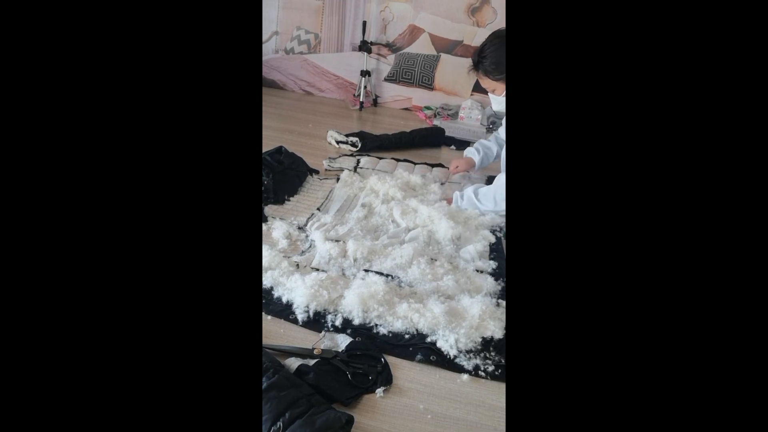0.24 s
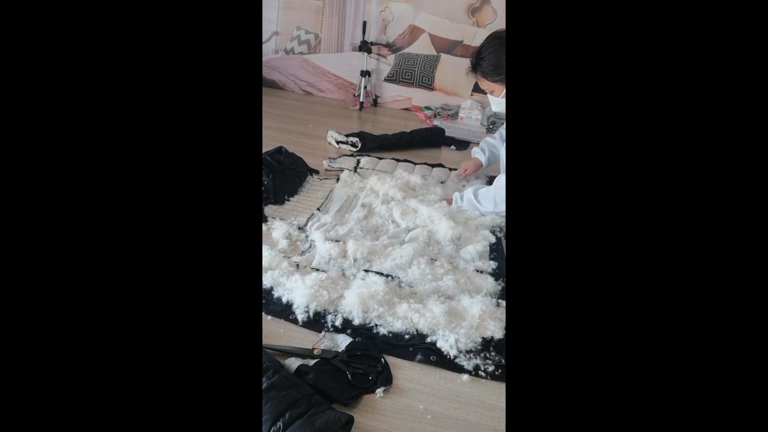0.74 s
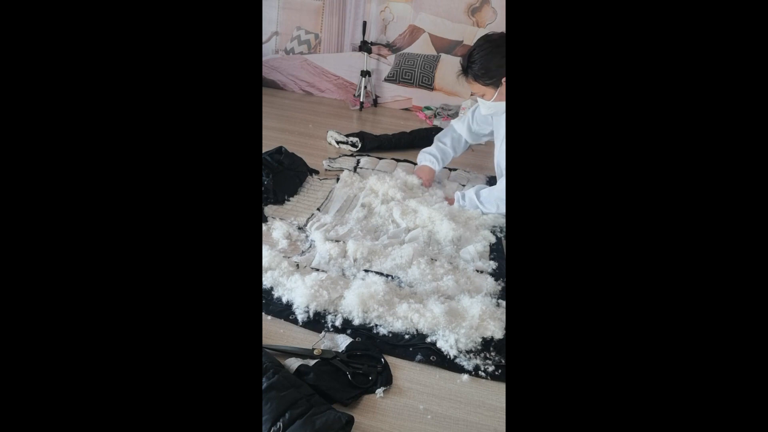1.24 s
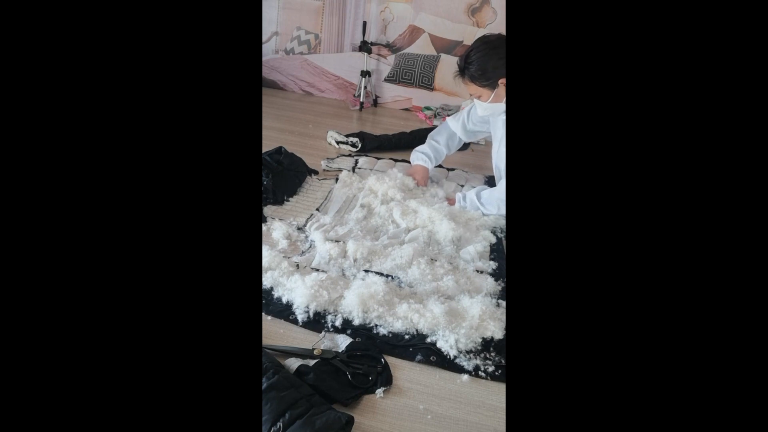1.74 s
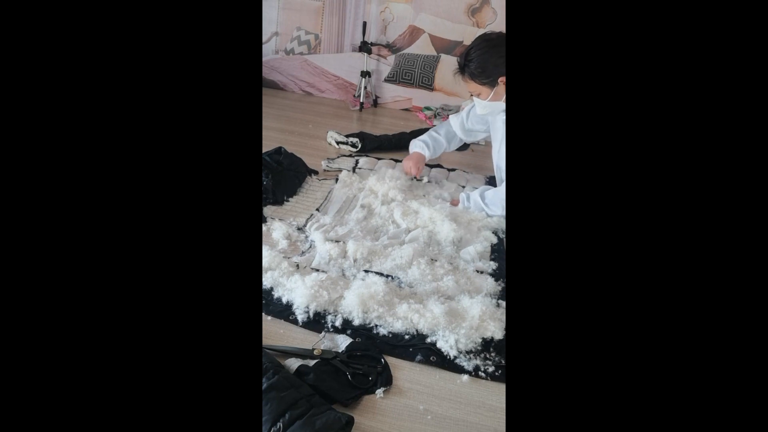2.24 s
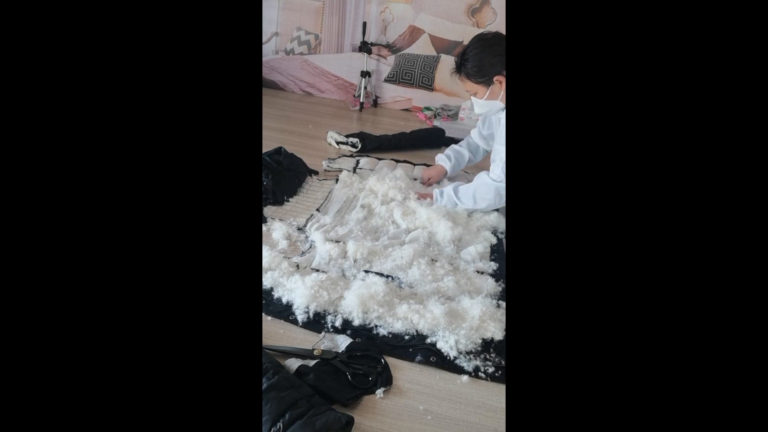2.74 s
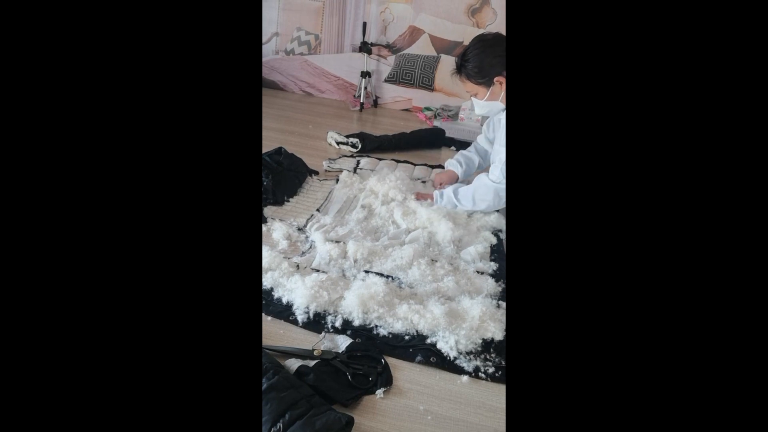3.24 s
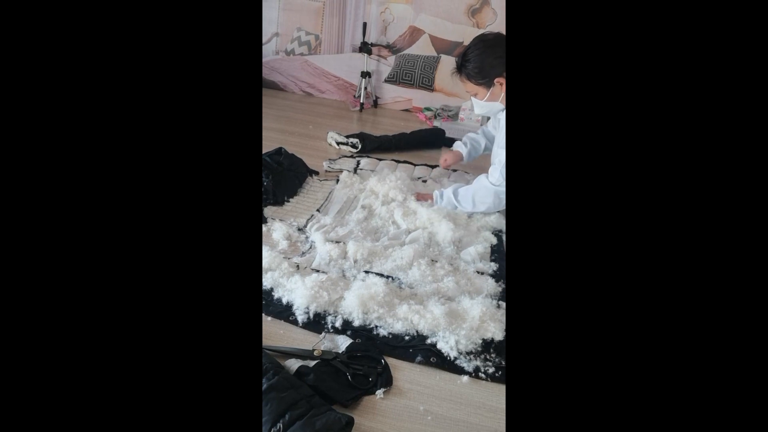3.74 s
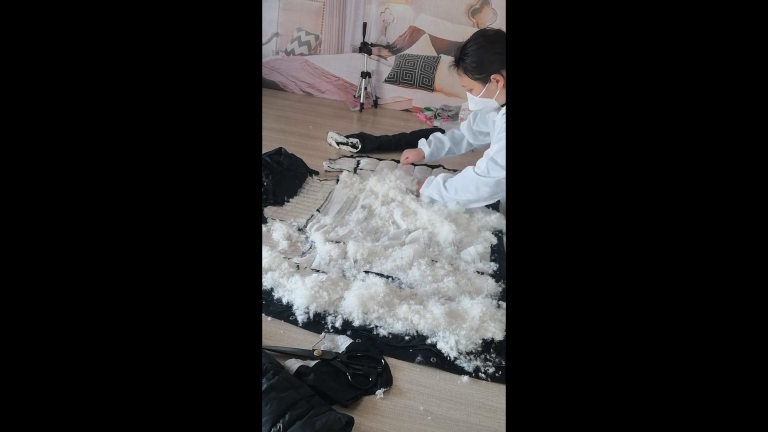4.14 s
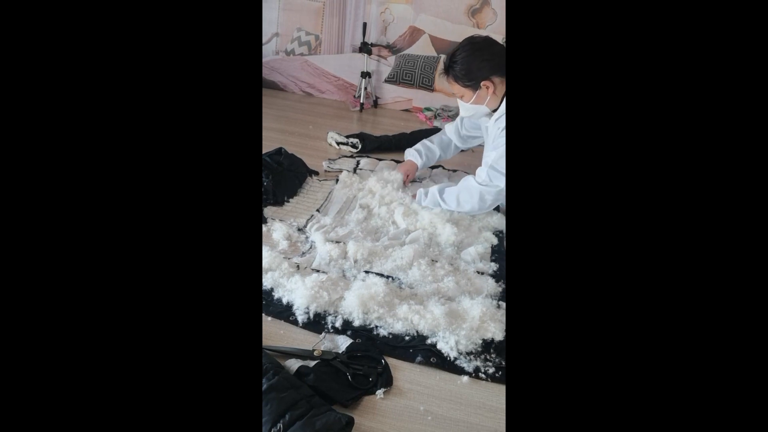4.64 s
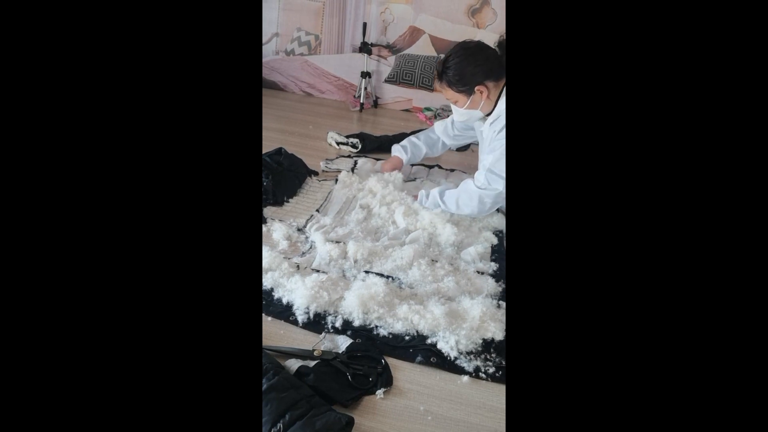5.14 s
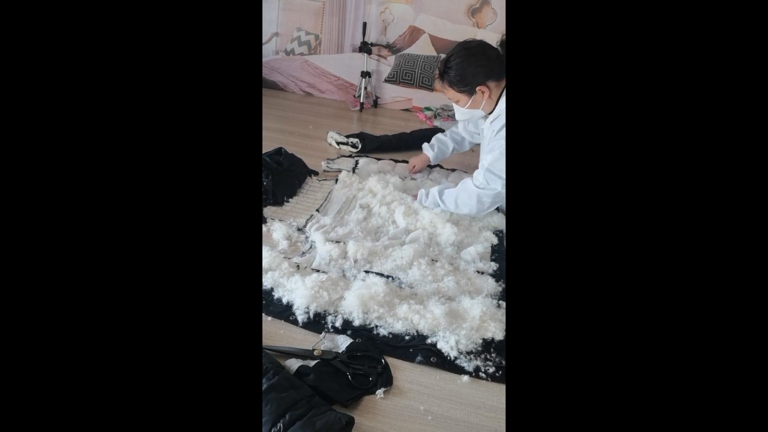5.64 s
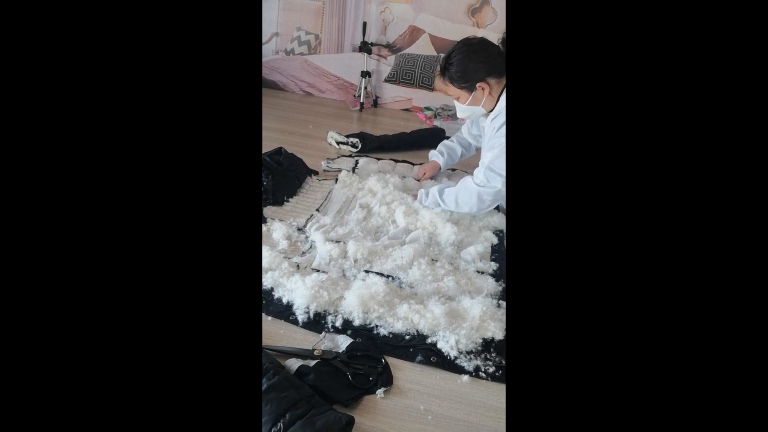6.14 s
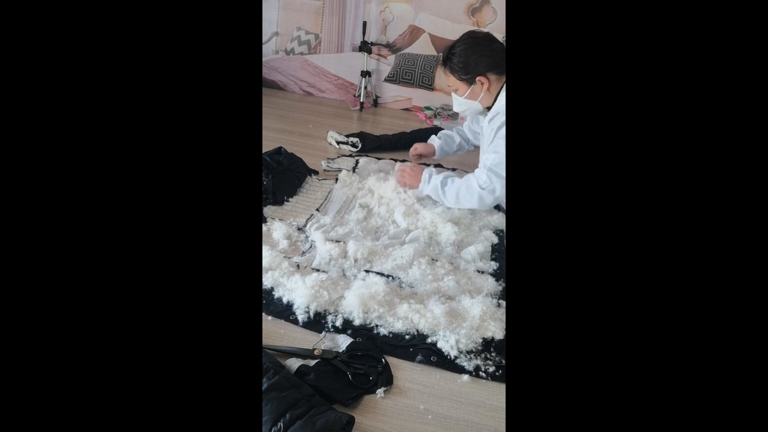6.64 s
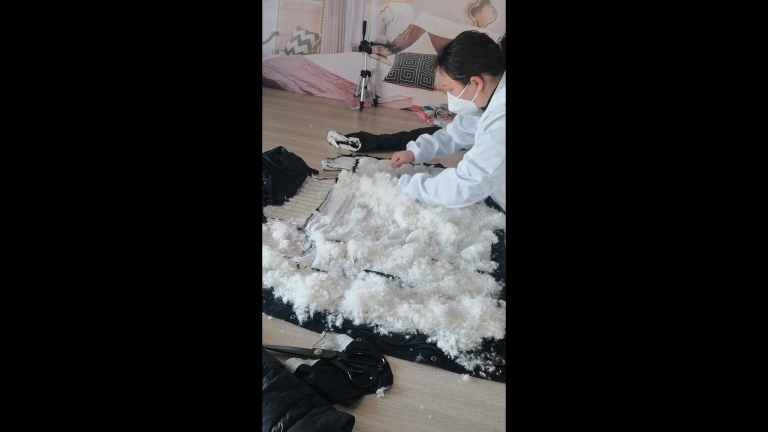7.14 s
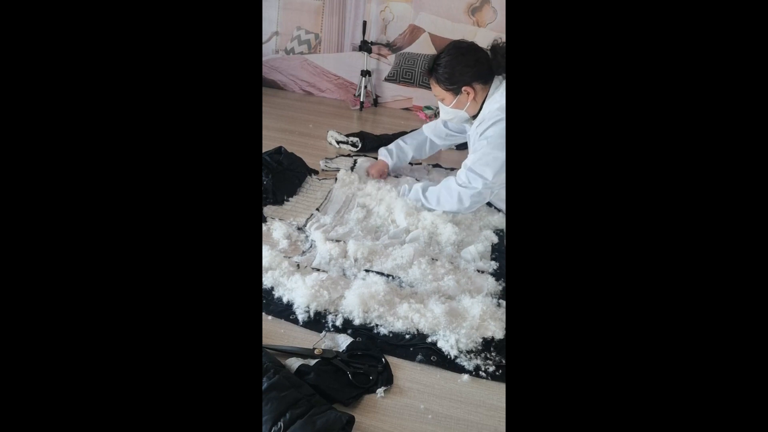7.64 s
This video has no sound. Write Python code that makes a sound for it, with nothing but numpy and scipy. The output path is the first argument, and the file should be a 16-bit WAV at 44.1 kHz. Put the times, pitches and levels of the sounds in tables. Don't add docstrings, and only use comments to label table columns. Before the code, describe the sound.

Irregular bursts of nylon fabric ripping, threads snapping brightly and stopping abruptly, close walls reflecting them over faint indoor room tone.

```python
import sys
import numpy as np
from scipy import signal
from scipy.fft import rfft, irfft, next_fast_len
from scipy.io import wavfile
from scipy.ndimage import uniform_filter1d, map_coordinates

SR = 44100
rng = np.random.default_rng(int(sys.argv[2]) if len(sys.argv) > 2 else 0)


def invert_db(x):
    u = np.asarray(x, float) / 20
    return 10 ** u


def file_out(sig):
    cols = np.atleast_2d(sig).T
    lim = np.clip(cols, -1, 1)
    pcm = np.round(lim * 32767).astype(np.int16)
    wavfile.write(sys.argv[1], SR, pcm)


N = 348390


def unit(x):
    return x / np.sqrt(np.mean(x ** 2) + 1e-20)


def along(points, hz):
    f, value = np.transpose(points)
    return np.interp(np.log(hz + 1), np.log(f + 1), value)


def wobble(rate):
    return map_coordinates(rng.standard_normal(int(N * rate / SR) + 4), [np.arange(N) * rate / SR])


def filtered(x, response):
    m = next_fast_len(x.shape[-1] + SR // 2)
    spectrum = rfft(x, m) * response(np.fft.rfftfreq(m, 1 / SR))
    return irfft(spectrum, m)[..., :x.shape[-1]]


def ringing(x, spectrum):
    hz = np.fft.rfftfreq(8192, 1 / SR)
    cepstrum = irfft(np.log(invert_db(along(spectrum, hz))))
    cepstrum[1:len(hz) - 1] *= 2
    cepstrum[len(hz):] = 0
    answer = irfft(np.exp(rfft(cepstrum)))
    return signal.fftconvolve(x, answer / np.linalg.norm(answer))[:N]


# how much later the right port hears it in ms, level in dB.
ARRIVAL_LINES = [(.545, 0), (.05, -6), (-.59, -4)]


def around(five):
    late_ms, db = np.transpose(ARRIVAL_LINES)[:, :, None]
    left = invert_db(db) * five[:3]
    right = filtered(left, lambda hz: np.exp(-2j * np.pi * hz * late_ms / 1000))
    own = invert_db(3) * filtered(five[3:], lambda hz: 1 / (1 + (500 / (hz + 1)) ** 2))
    return np.array([left.sum(0), right.sum(0)]) + own


# frequency in Hz, level in dB per Hz.
HOUSE_NOISE = [(12, -31), (20, -8), (49, -4), (103, -5.5), (157, -8), (281, -11.5), (371, -20), (666, -25),
               (855, -20), (1330, -24.5), (2140, -23.5), (2330, -25), (6890, -42), (8370, -43),
               (15400, -46.5)]


def house():
    def noise(gain):
        return unit(around(filtered(rng.standard_normal((5, N)), gain)))

    hum_db = -67 + wobble(6) + 0.53 * wobble(1.82)
    hum = invert_db(hum_db) * noise(lambda hz: invert_db(along(HOUSE_NOISE, hz)) * (hz < 550))
    hiss_db = -67.5 + 0.227 * wobble(2.756)
    hiss = invert_db(hiss_db) * noise(lambda hz: invert_db(along(HOUSE_NOISE, hz)) * (hz >= 550))
    return hum + hiss


# middle in seconds, half length in seconds, level in dB.
BRUSHES = [
    (.02, .15, -75),
    (1.188, 0.126, -73.5),
    (2.6, 0.244, -85),
    (4.42, 0.152, -80.5),
    (4.95, 0.087, -86),
    (7.305, 0.108, -78.5),
]


def sleeves():
    t = np.arange(N) / SR
    brushing = invert_db(-82.5) + sum(invert_db(db) * np.exp(-((t - s) / half) ** 2) for s, half, db in BRUSHES)
    flicker = invert_db(1.44 * wobble(25))
    noise = filtered(rng.standard_normal((5, N)), lambda hz: invert_db(along(FIZZ, hz) + along(TREBLE, hz)))
    return brushing * flicker * unit(around(noise))


# middle in seconds, half length in seconds, frequency in Hz, level in dB.
SQUEAKS = [
    (7.297, 0.042, 1498, -74.5),
    (7.54, 0.073, 1476, -72.5),
]


def hinge():
    t = np.arange(N) / SR
    return sum(invert_db(db) * np.exp(-((t - s) / half) ** 2) * np.sin(2 * np.pi * hz * t)
               for s, half, hz, db in SQUEAKS)


# frequency in Hz, seconds to fade by 60 dB.
ROOM_FADE = [(100, 0.634), (500, 0.3955), (2000, 0.4263), (7000, 0.3523)]


def room(x):
    five = np.zeros((5, N + SR))
    edges = [round(row[0] * SR) for row in GRIPS] + [N]
    for start, end in zip(edges, edges[1:]):
        hz, t, z = signal.stft(rng.standard_normal((5, SR // 2)), SR, nperseg=256)
        fade = invert_db(-60 * t / along(ROOM_FADE, hz)[:, None])
        tail = signal.istft(z * fade, SR, nperseg=256)[1]
        answer = signal.fftconvolve(x[None, start:end], tail / np.linalg.norm(tail[0]), axes=1)
        late = start + round(.011 * SR)
        five[:, late:][:, :answer.shape[1]] += answer
    return around(five[:, :N])


# delay at the left port in ms, delay at the right in ms, left level in dB, right level in dB.
PATHS = [
    (0, 0.0484, 2.5, -1.5),
    (5.9, 6.44, -3.5, 0.5),
    (10.1, 9.8, -11.5, -9),
    (11.1, 12, -10.5, -1.5),
    (17, 25, -4, -24),
]


def walls(x):
    left_ms, right_ms, left_db, right_db = np.transpose(PATHS)[:, :, None]

    def arrive(ms, db, hz):
        return (invert_db(db) * np.exp(-2j * np.pi * hz * ms / 1000)).sum(0)

    return filtered(x, lambda hz: np.array([arrive(left_ms, left_db, hz), arrive(right_ms, right_db, hz)]))


def swell(s, rise_s, db, fall_s):
    at = np.arange(max(round((s - .4) * SR), 0), min(round((s + .8) * SR), N))
    after = at / SR - s
    loss = np.where(after < 0, np.abs(after / rise_s) ** 1.574, np.abs(after / fall_s) ** 1.506)
    return at, after, invert_db(db - 20 * loss)


# peak in seconds, ring level in dB, seconds to lose 20 dB, fizz in dB relative to the ring.
JOLTS = [(.098, -24, 0.0449, -5.5), (.699, -20.5, 0.0352, -16.5), (1.408, -45, 0.0541, -17),
         (2.022, -37, -0.0162, -11), (2.062, -29.5, .03, -2), (2.903, -36.5, 0.0874, -7),
         (3.456, -48.5, 0.2564, -1), (3.582, -29.5, 0.0337, -2.5), (3.597, -28.5, 0.038, -24.5),
         (3.644, -35.5, 0.0743, -7), (5.045, -45.5, -0.21, -6), (5.053, -30, 0.0184, -10.5),
         (5.586, -31.5, 0.0321, -5), (5.639, -28.5, -0.0066, -9.5), (6.117, -48, 0.045, 8),
         (6.146, -36.5, 0.0513, 3), (7.654, -39, 0.1179, -7)]
# peak in seconds, seconds to gain 20 dB, ring level in dB,
# seconds to lose 20 dB, fizz in dB relative to the ring.
RUNS = [(.055, 0.09, -49.5, 0.9, -5), (.09, 0.0846, -43.5, -0.0144, -1), (0.168, 0.0962, -27, 0.1547, -5),
        (0.652, 0.0576, -37.5, 0.024, -2.5), (0.744, 0.0673, -27.5, 0.1732, -3),
        (1.482, 0.2, -51, 0.24, -11.5), (1.92, -0.43, -61.5, -0.02, -17), (2.12, 0.0708, -39, 0.1865, -8.5),
        (2.39, 6.93, -58, 0.23, -29), (2.89, 0.0475, -48.5, 0.0156, 2),
        (2.981, 0.1164, -30.5, 0.1625, -5.5), (3.55, 0.13, -56.5, 0.27, -7),
        (3.712, 0.11, -33.5, 0.121, -5.5), (5.118, 0.0743, -33.5, 0.0915, -7),
        (5.209, 0.1721, -43, 0.1742, -14), (5.718, 0.0821, -29, 0.0981, -6.5),
        (5.85, -1.92, -58.5, 0.1344, -11), (6.185, 0.0154, -39.5, 0.0672, 2),
        (6.253, 0.096, -35.5, 0.1358, -4), (7.75, 0.126, -40.5, 0.1132, -8),
        (7.88, 0.1667, -53, -0.36, -8.5)]
# start in seconds, slack cloth in dB relative to the ring,
# flap in dB relative to the ring, tautness from 0 to 1, share of small folds from 0 to 1.
GRIPS = [(0, -12, -16, 0.54, 0.245), (.55, -13, -10.5, 0.49, 0.059), (1.3, -15, -14, 0.52, .4),
         (1.85, -14.5, -9, 0.519, 0.122), (2.8, -9.5, -9.5, 0.448, 0.104), (3.4, -18.5, -14.5, 0.444, 0.5),
         (3.57, -10, -5.5, 0.419, 0.257), (4.5, -8, -25, 0.191, 0.71), (5.5, -9, -13.5, 0.365, 0.42),
         (6.05, -10.5, -10.5, 0.559, 0.141), (6.53, -9.5, -9, 0.082, .5), (7.6, -12, -14.5, 0.54, 0.222)]
LETS_GO = [
    .385,
    .98,
    1.61,
    2.48,
    3.17,
    3.9,
    5.345,
    5.92,
    6.44,
]
# middle in seconds, half length in seconds, ring level in dB, fizz level in dB.
TUFTS = [
    (2.092, 0.0116, -37.5, -23),
    (2.162, 0.0743, -48.5, -42),
    (2.975, 0.0161, -34, -43),
    (3.459, 0.0133, -46.5, -59),
    (4.785, 0.0183, -61, -70.5),
    (6.243, 0.0138, -37, -42.5),
    (7.682, 0.0085, -40.5, -40.5),
    (7.73, 0.0091, -48, -42.5),
]


def pulling():
    gain = np.zeros((5, N))
    jolt_rise_s, fizz_fades_db_per_s = 0.00642, 40
    for s, rise_s, db, fall_s, fizz_db in RUNS + [(s, jolt_rise_s, *rest) for s, *rest in JOLTS]:
        at, after, ring = swell(s, rise_s, db, fall_s)
        gain[0, at] += ring
        gain[1, at] += ring * invert_db(fizz_db - fizz_fades_db_per_s * np.maximum(after, 0))
    t = np.arange(N) / SR
    grips = np.transpose(GRIPS)
    current = np.searchsorted(grips[0], t, "right") - 1
    start, slack_db, flap_db, taut, small = grips[:, current]
    stop_db_per_s, tightens_per_s = 399, 0.178
    for s in LETS_GO:
        gain *= invert_db(-stop_db_per_s * np.maximum(t - s, 0) * (start < s))

    def late(lag_s):
        keep = np.exp(-1 / (lag_s * SR))
        return signal.lfilter([1 - keep], [1, -keep], gain[0])

    gain[2:4] = invert_db(slack_db) * late(0.00553), invert_db(flap_db) * late(0.0129)
    for s, half, ring_db, fizz_db in TUFTS:
        gain[[0, 4]] += invert_db([[ring_db], [fizz_db]]) * np.exp(-((t - s) / half) ** 2)
    return gain, np.clip(taut + tightens_per_s * (t - start), 0, 1), np.clip(small, 0, 1)


def threads(per_s, spread_db, clump_db):
    breaks = rng.random(N) < per_s / SR
    strength = np.minimum(rng.exponential(size=N), 2.5)
    return unit(breaks * invert_db(spread_db * strength + clump_db * wobble(110)))


# time in seconds, peak in dB, fizz in dB relative to the peak.
SNAPS = [(.0976, -18, -31), (0.1165, -32, -19), (0.174, -21, -7.5), (0.2171, -24, -16.5),
         (6.5754, -39.5, -26.5), (0.6566, -28, 0.5), (.699, -18.5, -23.5), (0.7072, -18, -21.5),
         (0.7485, -18.5, -11), (0.858, -25, -17.5), (1.481, -32, -9.5), (2.0189, -32, -9.5),
         (2.0611, -19, -19), (2.0984, -30, 2.5), (2.1111, -23.5, -17), (2.9376, -18.5, -3),
         (2.9752, -18.5, -11), (3.4592, -34, -3.5), (3.6409, -18, 3), (3.6979, -22.5, -4),
         (3.736, -29.5, -8), (5.1151, -24.5, -11.5), (5.6352, -23.5, -1.5), (5.678, -18.5, -2.5),
         (5.7437, -31.5, -14.5), (6.1797, -25.5, 5), (6.2417, -22.5, -3.5), (7.6545, -26, -18.5),
         (7.675, -26, -10), (7.7462, -31, 2)]
# time in seconds, peak in dB.
TICKS = [(.0616, -48), (0.6126, -41.5), (.6315, -32), (1.399, -43.5), (1.4074, -44.5), (2.4115, -52.5),
         (2.8669, -41.5), (2.8803, -37.5), (2.9031, -25.5), (3.4503, -45), (3.55, -49.5), (3.5788, -49),
         (3.5897, -26.5), (4.756, -53.5), (5.0399, -49.5), (5.0454, -30), (5.565, -38.5), (5.5861, -36.5),
         (5.6166, -33.5), (6.115, -38), (6.142, -28), (0.642, -36.5), (.0419, -56), (0.0494, -50.5),
         (5.5731, -45), (7.6491, -29.5), (7.6629, -32), (7.7225, -37.5)]


def snap_kicks():
    kicks = np.zeros((4, N))
    tick_fizz_db = -5
    s, db, fizz_db = np.transpose(SNAPS + [(s, db, tick_fizz_db) for s, db in TICKS])
    at = np.round(s * SR).astype(int)
    kicks[0, at] += invert_db(db + 14)
    kicks[1, at] -= invert_db(db + fizz_db + 18)
    kicks[2, at] += invert_db(db - 16)
    return kicks


# frequency in Hz, level in dB per Hz.
RING = [(650, -34), (1000, -5), (1300, 7.5), (1600, 7), (2000, 8.5), (2500, 3.5), (3100, 0.5), (3700, -7.5),
        (4600, -23.5)]
FIZZ = [(3100, -15.5), (4000, -5.5), (5000, -2), (6300, 0), (7200, -2), (15000, -1.5)]
SIZZLE = [(3000, -17), (4500, -10.5), (5600, -3), (6400, 4.5), (7200, -6.5), (9000, -10.5), (15000, -6)]
SLACK = [(250, -36.5), (400, -1.5), (600, -3), (850, -1), (1300, -25.5)]
SMALL_FOLDS = [(500, -28), (720, 0), (810, 0.5), (950, 1), (1150, -11), (1500, -30.5)]
FLAP = [(25, -25), (65, -13.5), (105, -4), (122, 1), (138, -1), (160, -9), (240, -3.5), (315, -6),
        (480, -31.5)]


def tear():
    gain, taut, small = pulling()
    shared = threads(per_s=1200, spread_db=3.6, clump_db=3)
    kicks = gain[:4] * unit(shared * invert_db(5 * rng.uniform(-1, 1, (4, N))))
    fibres = threads(per_s=5000, spread_db=3, clump_db=4) * rng.choice([-1, 1], N)
    kicks[1] = -.7 * kicks[1] + 1.014 * gain[1] * fibres
    kicks += snap_kicks()
    loose_ring = [(hz * 0.8987, db) for hz, db in RING]
    tight_ring = [(hz * 1.2716, db) for hz, db in RING]
    ring = ringing(kicks[0] * (1 - taut), loose_ring) + ringing(kicks[0] * taut, tight_ring)
    fizz = ringing(kicks[1], FIZZ) + ringing(gain[4] * fibres, SIZZLE)
    folds = ringing(kicks[2] * (1 - small), SLACK) + ringing(kicks[2] * small, SMALL_FOLDS)
    flap = ringing(kicks[3], FLAP)
    return -invert_db([-8, -6, -9.5, -9.5]) @ np.array([ring, fizz, folds, flap])


# frequency in Hz, level in dB.
TREBLE = [(7300, 0), (7900, -8), (8300, -24.5), (8800, -36.5), (9300, -6), (9900, -15), (10700, -19),
          (15000, -23), (15600, -52.5)]


def scene():
    cloth = tear()
    indoors = walls(cloth) + invert_db(-2.5) * room(cloth)
    background = house() + sleeves() + hinge()
    left, right = filtered(indoors, lambda hz: invert_db(along(TREBLE, hz))) + background
    side = filtered(left - right, lambda hz: 1 / (1 + (140 / (hz + 1)) ** 2)) / 2
    return (left + right) / 2 + np.array([side, -side])


def band_limit(x):
    return signal.sosfilt(signal.butter(12, 15590, fs=SR, output="sos"), x)


def record(dry):
    hz, _, z = signal.stft(dry, SR, nperseg=1024)
    field = uniform_filter1d(rng.standard_normal(z.shape[1:]), size=14, axis=0)
    field = uniform_filter1d(field, size=3, axis=1)
    chance = along([(8200, -0.071), (9800, 0.647), (10800, 0.9)], hz)[:, None]
    kept = 1 / (1 + np.exp(-4 * (unit(field) + chance)))
    kept[hz > 15400] = 0
    patchy = signal.istft(z * np.where(hz[:, None] > 8150, kept, 1), SR, nperseg=1024)[1][:, :N]
    return band_limit(patchy)


dry = scene()
out = record(dry)
file_out(out)
```